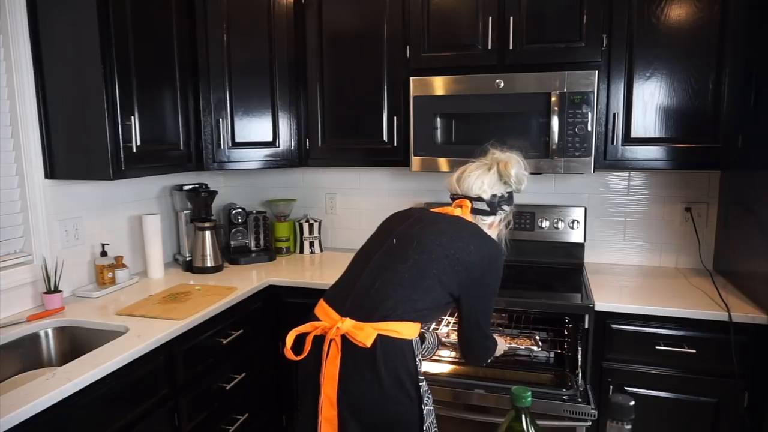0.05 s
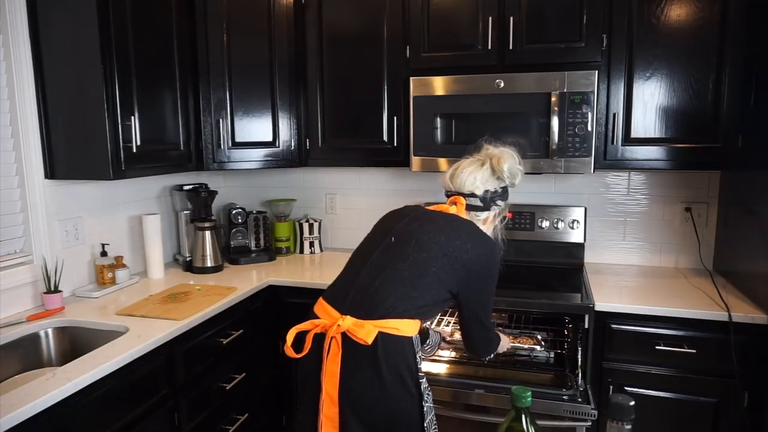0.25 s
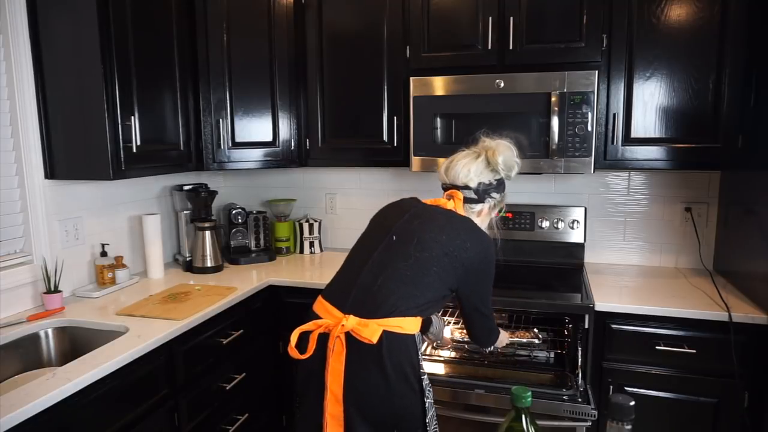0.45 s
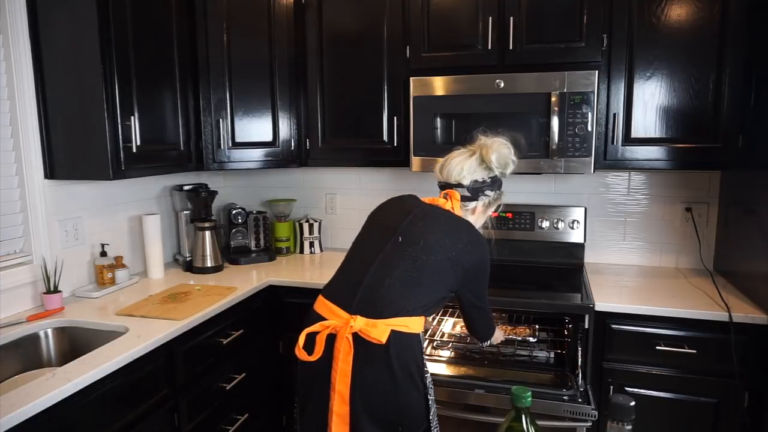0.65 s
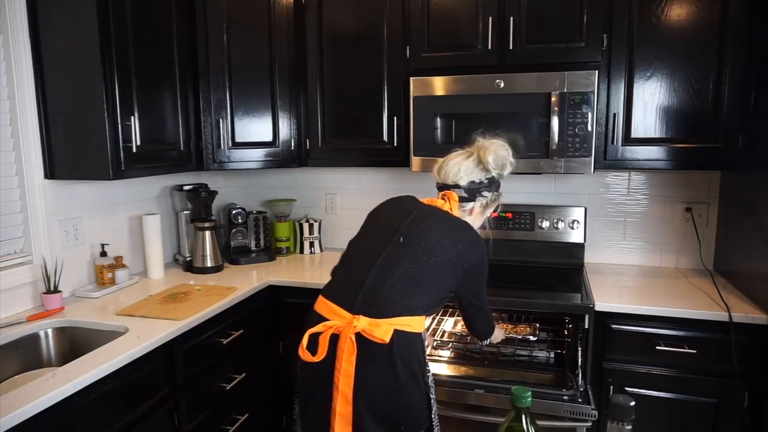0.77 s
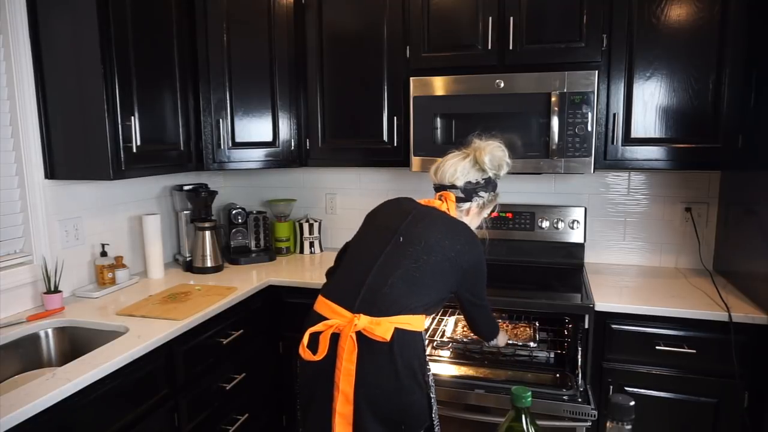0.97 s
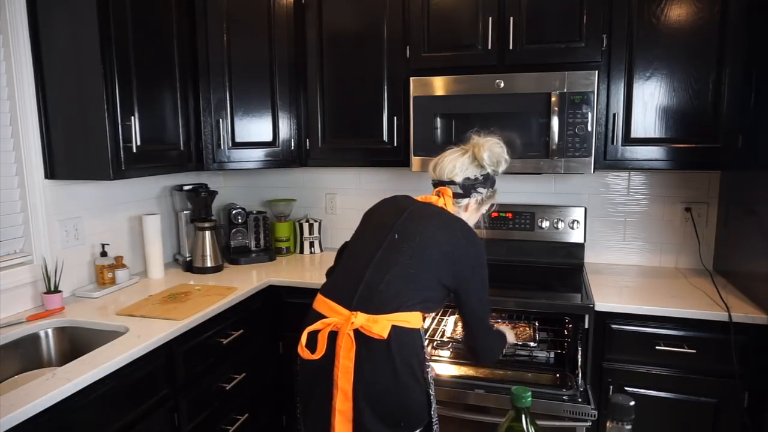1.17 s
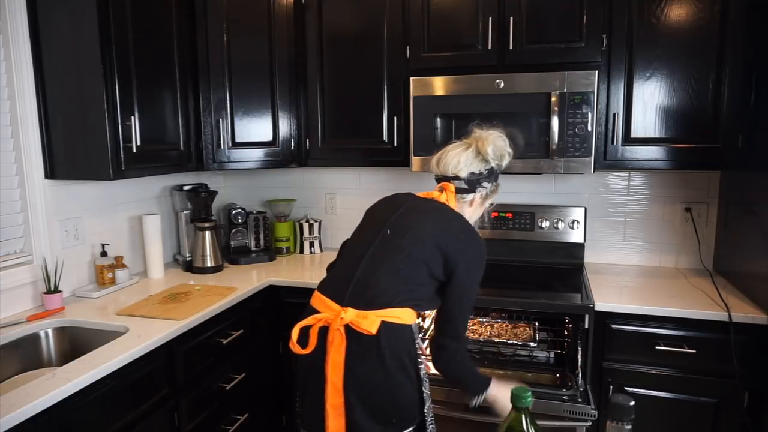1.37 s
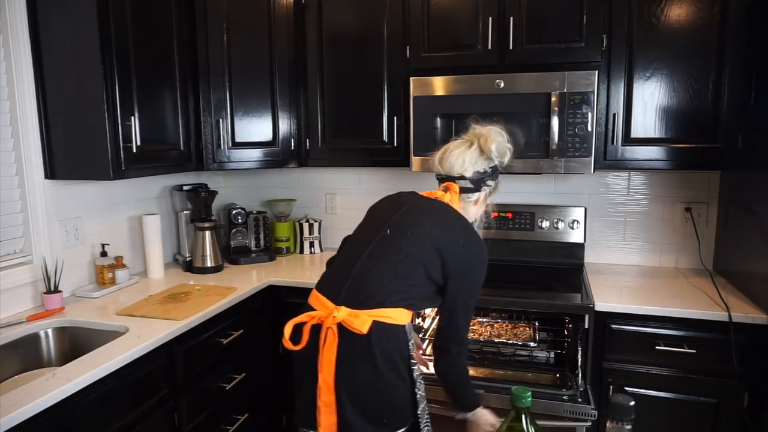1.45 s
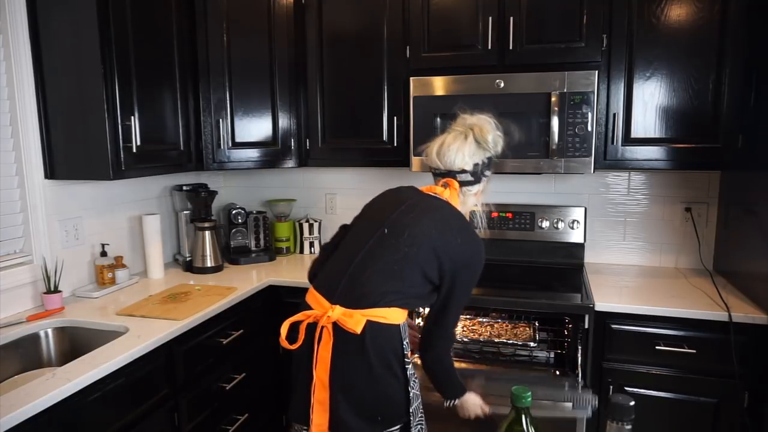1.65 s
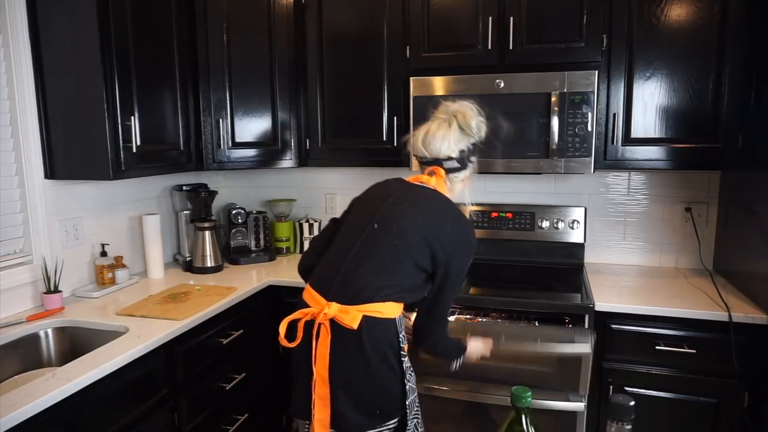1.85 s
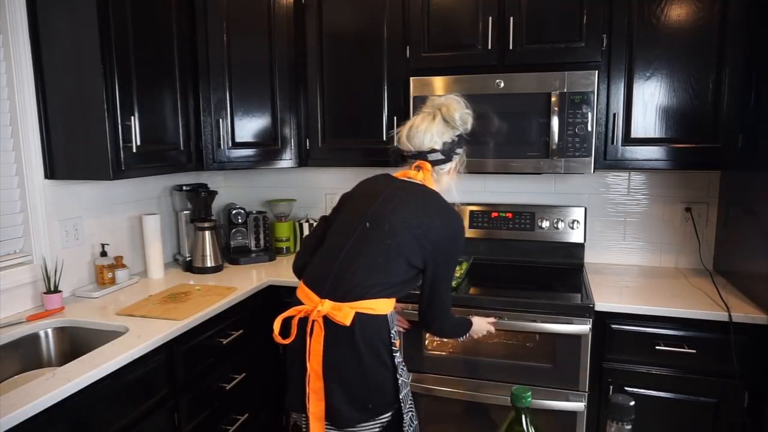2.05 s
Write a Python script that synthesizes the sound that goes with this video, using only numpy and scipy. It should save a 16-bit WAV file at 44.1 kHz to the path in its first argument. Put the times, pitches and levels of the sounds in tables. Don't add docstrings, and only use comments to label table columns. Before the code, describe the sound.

Gritty metal scraping of a dish pushed into an oven, ending suddenly, then a few hollow pan knocks with clatter and a faint door creak and latch tick, over quiet air hiss in a lightly reverberant kitchen.

```python
import sys
import numpy as np
from scipy import signal
from scipy.io import wavfile
from scipy.ndimage import uniform_filter1d

SR = 44100
rng = np.random.default_rng(int(sys.argv[2]) if len(sys.argv) > 2 else 0)


def persist_wave(psi):
    counts = np.round(np.clip(psi, -1, 1) * 32767).astype(np.int16)
    wavfile.write(sys.argv[1], SR, np.atleast_2d(counts).T)


def voltage_ratio(level):
    return 10 ** (np.asarray(level, float) / 20)


N = 92610
T = np.arange(N) / SR
EDGES = 35 * 2 ** np.arange(0, 9.1, 1 / 3)
CENTRES = np.sqrt(EDGES[1:] * EDGES[:-1])


def rms_one(x):
    return x / np.sqrt(np.mean(x ** 2) + 1e-20)


def peak_one(x):
    return x / np.abs(x).max()


def at_hz(points, hz):
    table = np.array(points)
    return np.interp(np.log(hz), np.log(table[:, 0]), table[:, 1])


def bands(sources):
    split = []
    for k, (low, high) in enumerate(zip(EDGES, EDGES[1:])):
        band = signal.butter(2, [low, high], "band", fs=SR, output="sos")
        split.append(signal.sosfilt(band, sources[k % 2]))
    return np.array(split)


def ring(x, hz, t60):
    r, w = voltage_ratio(-60 / (t60 * SR)), 2 * np.pi * hz / SR
    return signal.lfilter([0, np.sin(w)], [1, -2 * r * np.cos(w), r * r], x + 1e-18)


def dying(s, t60):
    out, start = np.zeros(N), int(s * SR)
    out[start:] = np.exp(-np.log(1000) * T[:N - start] / max(t60, .003))
    return out


def drift(rate):
    r = np.exp(-32 * np.pi * rate / SR)
    noise = rng.standard_normal(N // 16 + 1002)
    slow = signal.lfilter([1], [1, -2 * r, r * r], noise)[1000:]
    return np.interp(np.arange(N) / 16, np.arange(len(slow)), rms_one(slow))


def air():
    # (frequency [Hz], level per Hz [dB])
    hiss = [(18, -41), (30, -25), (90, -10.5), (277, -8.5), (389, -11.5), (455, -5.5), (728, -12.5),
            (1080, -10.5), (7460, -24.5), (15500, -44.5)]
    split = bands(rng.standard_normal((2, N)))
    shaped = sum(voltage_ratio(at_hz(hiss, hz) + 1.1 * drift(1.6)) * b for hz, b in zip(CENTRES, split))
    return voltage_ratio(-58) * rms_one(shaped)


def slide():
    # (time [s], friction level [dB], scratch centre [Hz], load on the oven body [dB])
    strokes = [
        [(0, -59, 4050, 12), (.024, -75, 4050, -22), (.028, -51.5, 4530, -21), (.116, -53.5, 3980, -24),
         (.122, -44.5, 3400, -34), (.178, -42, 4940, -11), (.218, -58, 2430, -14), (.226, -38.5, 3530, -17),
         (.24, -52, 3000, -13)],
        [(.2405, -28, 3840, -17.5), (.255, -24, 2840, -9), (.29, -32, 2700, -0.5), (.34, -34, 2920, -4),
         (.37, -33.5, 3100, -7), (.405, -29, 4000, -14.5), (.428, -27, 3430, -4)],
        [(.4285, -17, 3260, -17), (.455, -21.5, 2700, -6), (.526, -19.5, 5130, -7), (.58, -21, 6000, -6.5),
         (.638, -19, 5750, -16.5), (.67, -27, 5500, -3), (.685, -26, 5300, -7), (.73, -27.5, 4200, -6.5),
         (.8, -37.5, 4350, -2.5)],
    ]
    # (frequency [Hz], level per Hz [dB])
    scratch_tone = [(530, -34), (900, 2.5), (1610, -5), (2510, -5), (4280, -8), (6050, -8.5), (6730, -8.5),
                    (15500, -28)]
    # (frequency [Hz], level per Hz [dB])
    body_tone = [(24, -66), (40, -47), (181, -29), (218, -55), (258, -29), (315, -2), (390, -5), (1200, -8),
                 (1560, -38), (2640, -120)]
    # (frequency [Hz], width [Hz], level [dB])
    wire_modes = [(1070, 37, -7), (1240, 51, -7), (2550, 90, -12), (2900, 90, -7), (3200, 110, -6),
                  (3690, 62, -6), (4970, 90, -5), (5580, 35, -4), (5950, 60, 3), (6110, 45, -4),
                  (7310, 40, -8), (8400, 60, -11), (9910, 160, -18)]
    slips_per_s, slip_spread_db = 9000, 2.5
    hum_hz, hum_t60_s, hum_db = 218, .11, -7

    s, *columns = np.transpose(np.concatenate(strokes))
    level_db, centre_hz, load_db = (np.interp(T, np.sort(s), c) for c in columns)

    sizes = voltage_ratio(slip_spread_db * np.minimum(rng.exponential(1, (2, N)), 4))
    sizes = sizes * rng.choice([-1, 1], (2, N))
    slips = sizes * (rng.random((2, N)) < slips_per_s / SR) * voltage_ratio(.9 * drift(70))
    split = bands(slips)

    def bump(hz, db, octaves):
        return voltage_ratio(db * np.exp(-(np.log2(hz / centre_hz) / octaves) ** 2))

    def even(x):
        return x / np.sqrt(uniform_filter1d(x ** 2, size=6000))

    scratch, body, wires = np.zeros(N), np.zeros(N), np.zeros(N)
    for hz, b in zip(CENTRES, split):
        if hz > 1000:
            scratch += voltage_ratio(at_hz(scratch_tone, hz) + 1.6 * drift(23.0)) * bump(hz, 9, 1) * b
        else:
            body += voltage_ratio(at_hz(body_tone, hz) + 2.57 * drift(3.5)) * b
    for hz, width, db in wire_modes:
        tone = rms_one(ring(slips[0], hz, 2.5 / width))
        wires += voltage_ratio(db) * width ** .5 * tone * bump(hz, 16, .4)
    body = rms_one(body) + voltage_ratio(hum_db) * rms_one(ring(slips[1], hum_hz, hum_t60_s))
    return voltage_ratio(level_db) * (even(scratch) + voltage_ratio(-10) * even(wires) + voltage_ratio(load_db) * body)


def kitchen(*sounds):
    # (frequency [Hz], t60 [s])
    room_t60 = [(100, 0.39), (1000, 0.87), (5000, 0.88), (14000, 0.56)]
    room_db, delay_s = -7, 0.0039
    split = bands(rng.standard_normal((2, N)))
    tail = sum(b * dying(delay_s, at_hz(room_t60, hz)) for hz, b in zip(CENTRES, split))
    tail = voltage_ratio(room_db) * tail / np.sqrt(np.sum(tail ** 2))
    return [x + signal.fftconvolve(x, tail)[:N] for x in sounds]


def singing(rows):
    out = np.zeros(N)
    for s, length, db, hz, width in rows:
        near = slice(max(int((s - length) * SR), 0), int((s + length) * SR))
        noise = rng.standard_normal(N)[near]
        tone = rms_one(ring(ring(noise, hz, 1.4 / width), hz, 1.4 / width))
        out[near] += voltage_ratio(db) * tone * np.exp(-((T[near] - s) / (.4 * length)) ** 2)
    return out


def catches():
    # (time [s], peak level [dB], frequency [Hz], t60 [s])
    jolts = [(.2408, -21, 3150, .055), (.243, -22, 4040, .045), (.245, -22, 3230, .05),
             (.242, -28, 1850, .06), (.4282, -17, 2950, .08), (.4284, -22, 2200, .08),
             (.4284, -22, 3500, .03), (.432, -23, 5500, .04)]
    rings = np.zeros(N)
    for s, db, hz, t60 in jolts:
        jolt = dying(s, .004) * rng.standard_normal(N)
        rings += voltage_ratio(db) * peak_one(ring(jolt, hz, t60))
    return signal.sosfilt(signal.butter(2, 8000, fs=SR, output="sos"), rings)


def knocks():
    # (time [s], peak level [dB], hardness as cut-off [Hz], clatter t60 [s])
    blows = [(1.036, -43.5, 850, 0.12), (1.049, -49.5, 810, 0.068), (1.071, -50.5, 700, 0.19),
             (1.1953, -14, 2870, 0.12), (1.275, -26.5, 785, 0.028), (1.234, -30, 1470, 0.054),
             (1.249, -29, 2600, 0.11), (1.298, -33.5, 2020, 0.074), (1.327, -29.5, 4170, 0.23),
             (1.331, -26.5, 1230, 0.026), (1.36, -27, 4700, 0.1), (1.367, -26, 1560, 0.14),
             (1.4786, -27.5, 1520, 0.019), (1.481, -18, 986, 0.031), (1.491, -27, 1010, 0.054),
             (1.495, -30, 3080, 0.25)]
    # (frequency [Hz], level [dB], t60 [s])
    panel_modes = [(149.6, -1.5, 0.12), (215, 2.5, 0.19), (282, -5, 0.094), (419, -2, 0.066),
                   (470, -20, 0.099), (700, -0.5, 0.074), (810, 6.5, 0.074), (1180, -23, 0.079),
                   (1900, 3.5, 0.074), (2050, 8, 0.057), (3100, 3, 0.057), (3500, -14, 0.057)]
    panels_db, clatter_db, tilt_db = -4, 1.5, -2.5
    out, split = np.zeros(N), bands(rng.standard_normal((2, N)))
    for s, db, cut_hz, t60 in blows:
        soft = signal.butter(3, min(cut_hz, 15000), fs=SR, output="sos")
        push = signal.sosfilt(soft, dying(s, .005) * rng.standard_normal(N))
        panels, clatter = np.zeros(N), np.zeros(N)
        for hz, mode_db, ring_s in panel_modes:
            panels += voltage_ratio(mode_db + rng.normal(0, 0.8)) * peak_one(ring(push, hz, ring_s))
        for hz, b in zip(CENTRES, split):
            clatter += b * voltage_ratio(tilt_db * np.log2(hz / 1000)) * dying(s, t60 * (1000 / hz) ** 0.022)
        panels = voltage_ratio(panels_db) * peak_one(signal.sosfilt(soft, panels))
        clatter = voltage_ratio(clatter_db) * peak_one(signal.sosfilt(soft, clatter))
        out += voltage_ratio(db) * (panels + clatter)
    return signal.sosfilt(signal.butter(4, 161, "high", fs=SR, output="sos"), out)


def rubs():
    # (time [s], rms level [dB], colour [Hz], rise [s], t60 [s])
    strokes = [(1.197, -59, 59, .003, 1.2), (1.48, -54, 61, .003, 0.83), (1.292, -61, 5900, .004, 0.89),
               (1.328, -61, 6000, 0.0018, 0.042), (1.36, -45, 5900, .002, 0.025),
               (1.481, -47, 2470, 0.0018, 0.089), (1.498, -48, 3580, 0.0047, 0.24),
               (1.66, -73, 7500, 0.008, 0.045), (1.702, -61, 7450, .003, 0.14),
               (2.056, -70, 6500, .003, .06), (1.748, -53.5, 1640, 0.0053, 0.69),
               (1.85, -43, 2640, 0.0063, 0.3), (1.915, -47, 1210, 0.11, 0.44),
               (1.919, -51, 2440, 0.037, 0.12), (1.915, -62.5, 6000, .03, 0.11),
               (1.989, -51, 1500, 0.028, 0.096)]
    reach = 1.7
    out = np.zeros(N)
    for s, db, hz, rise, t60 in strokes:
        colour = signal.butter(3, [hz / reach, min(hz * reach, 16000)], "band", fs=SR, output="sos")
        noise = rms_one(signal.sosfilt(colour, rng.standard_normal(N))) * voltage_ratio(0.57 * drift(80))
        swell = (T < s) * np.clip(1 + (T - s) / rise, 0, 1) ** 2
        out += voltage_ratio(db) * noise * (dying(s, t60) + swell)
    return out


def hinge():
    # (time [s], peak level [dB], colour [Hz], colour width [octaves])
    ticks_of = [
        [(1.497, -35, 2600, 1), (1.504, -39, 3800, 1), (1.511, -40, 4200, 1.1), (1.703, -51, 6000, .16),
         (1.705, -57, 8300, .3), (2.056, -63, 5900, .2), (1.745, -56, 3710, .12), (1.747, -51, 2400, .3),
         (1.747, -53, 950, .2)],
        [(1.846, -37, 3700, 1.3), (1.847, -43, 5240, .1)],
    ]
    # (frequency [Hz], level [dB], t60 [s])
    modes_of = [
        [(950, -5, .08), (2170, -3, .07), (2350, 2, .1), (2720, -2, .05), (3580, -7, .12), (3710, -8, .1),
         (4330, -6, .06), (4800, -6, .07), (5080, -9, .07), (5890, -7, .09), (6140, -16, .05), (7920, -7, .05),
         (8630, -9, .04), (12700, 0, .07)],
        [(1114, -1, .05), (2100, 0, .07), (2500, -4, .1), (3230, -4, .05), (3460, -3, .05), (4190, 1, .12),
         (5240, -1, .07), (6150, -6, .05)],
    ]
    out = np.zeros(N)
    for ticks, modes in zip(ticks_of, modes_of):
        for s, db, colour_hz, width in ticks:
            rub = dying(s, .03) * rng.standard_normal((len(modes), N))
            cut_hz = min(colour_hz * 2 ** (width / 2 + .4), 15000)
            soft = signal.butter(4, cut_hz, fs=SR, output="sos")
            tick = np.zeros(N)
            for r, (hz, mode_db, t60) in zip(rub, modes):
                off_colour_db = 6 * (np.log2(hz / colour_hz) / width) ** 2
                tone = signal.sosfilt(soft, peak_one(ring(r, hz, t60)))
                tick += voltage_ratio(mode_db - off_colour_db) * tone
            out += voltage_ratio(db) * peak_one(tick)
    return out


def scene():
    # (middle time [s], length [s], rms level [dB], frequency [Hz], width [Hz])
    wire_songs = [(.14, 0.064, -53.5, 1040, 90), (.155, 0.064, -56, 2530, 70), (.21, 0.034, -52, 2480, 60),
                  (.178, 0.024, -44.5, 4970, 900), (.26, 0.048, -34.5, 1910, 200),
                  (.275, 0.059, -35, 574, 60), (.31, 0.066, -33.5, 3030, 350),
                  (.335, 0.038, -33.5, 2680, 80), (.39, 0.072, -41, 1900, 200),
                  (.45, 0.039, -32, 2280, 200), (.445, 0.071, -30.5, 3030, 150),
                  (.52, 0.036, -31.5, 5960, 50), (.53, 0.037, -32, 3224, 60), (.53, 0.084, -32, 545, 90),
                  (.563, 0.05, -36, 1060, 40), (.572, 0.04, -29, 5590, 50), (.612, 0.072, -26.5, 4990, 164),
                  (.62, 0.052, -33, 7260, 150), (.635, 0.045, -29, 3810, 60), (.648, .055, -25.5, 5940, 90),
                  (.685, .05, -34, 6150, 90), (.69, 0.044, -41, 4860, 120), (.735, 0.017, -30.5, 3620, 120),
                  (.76, 0.061, -54, 5950, 60)]
    # (middle time [s], length [s], rms level [dB], frequency [Hz], width [Hz])
    door_songs = [(1.515, .05, -44, 2350, 70), (1.52, .06, -51, 3600, 110), (1.63, .06, -61, 2350, 50),
                  (1.71, .04, -61, 2350, 50), (1.725, .03, -63, 3710, 50), (1.772, .055, -55, 3710, 40),
                  (1.785, .04, -65, 4190, 50), (1.885, .04, -57, 5240, 50), (1.875, .07, -49, 4190, 25),
                  (1.745, .06, -64, 5890, 50), (1.915, .04, -55, 3230, 60), (1.92, .08, -49, 1114, 70),
                  (1.935, .04, -57, 5300, 300), (1.98, .08, -56, 4190, 25)]
    change_s = .8025
    door_wet = .4

    scrape = slide() * voltage_ratio(-3.0) + catches() + singing(wire_songs)
    door = hinge() + singing(door_songs)
    before, after = kitchen(scrape, knocks() + door_wet * door)
    before = signal.sosfilt(signal.butter(3, 90, "high", fs=SR, output="sos"), before)
    before = before * np.clip((change_s - T) * 2000, 0, 1)
    return (before + after + (1 - door_wet) * door + rubs() + air())[None]


def low_pass(x):
    return signal.sosfilt(signal.butter(12, 15980, fs=SR, output="sos"), x)


def record(dry):
    mix = np.tanh(dry)
    return low_pass(mix)


dry = scene()
out = record(dry)
persist_wave(out)
```